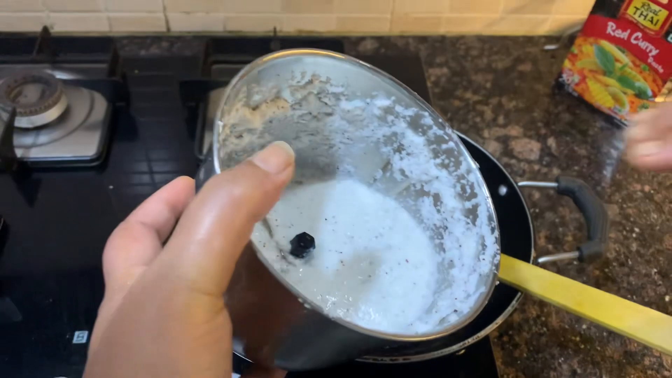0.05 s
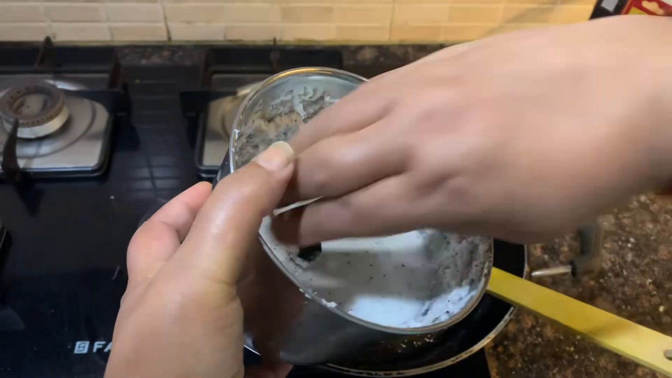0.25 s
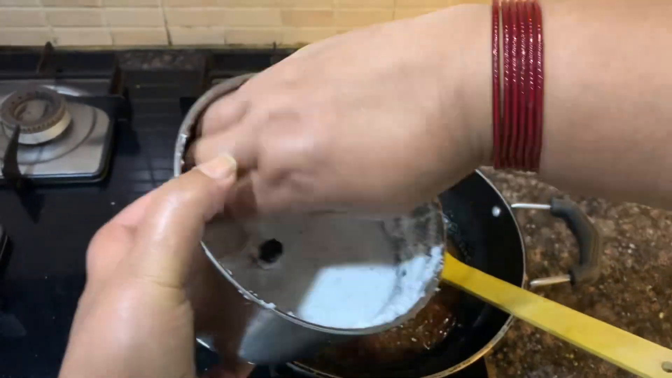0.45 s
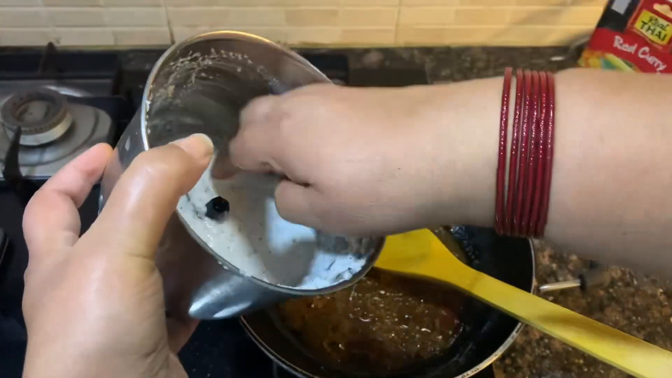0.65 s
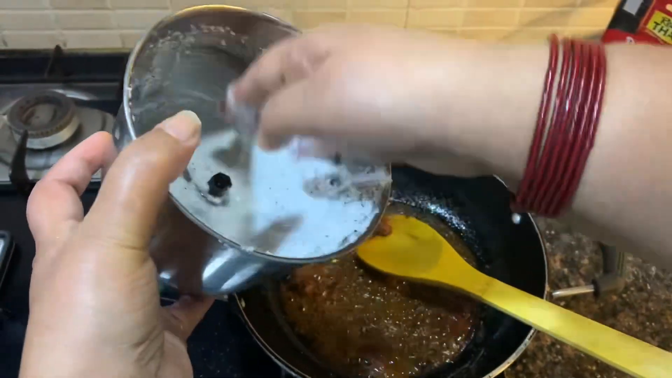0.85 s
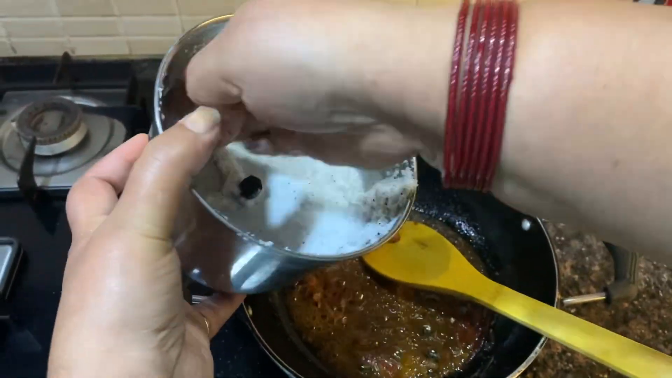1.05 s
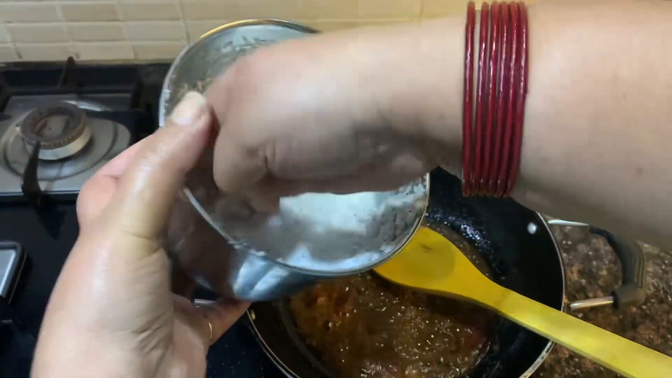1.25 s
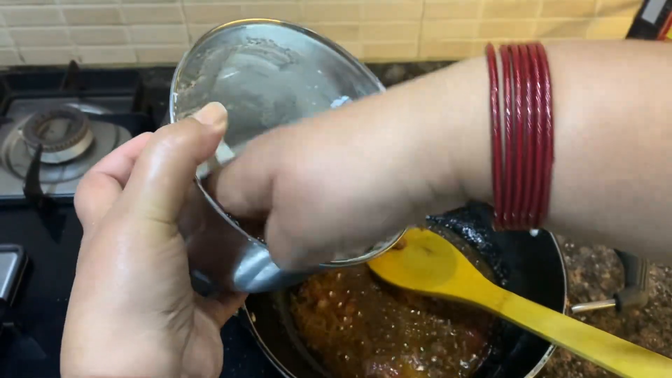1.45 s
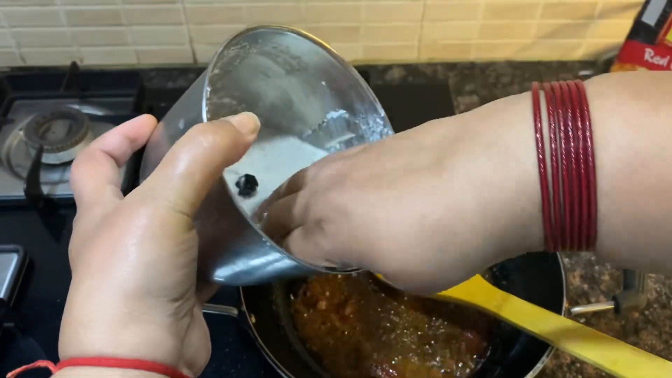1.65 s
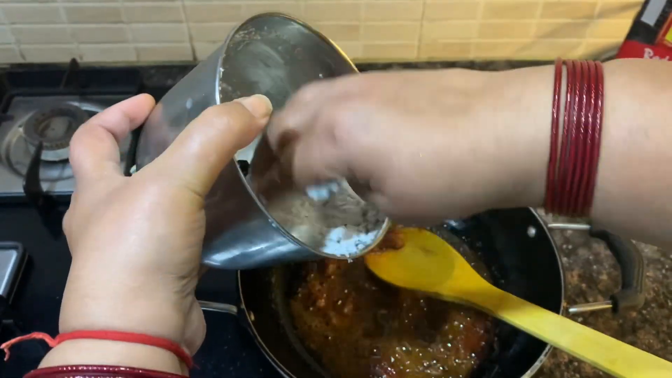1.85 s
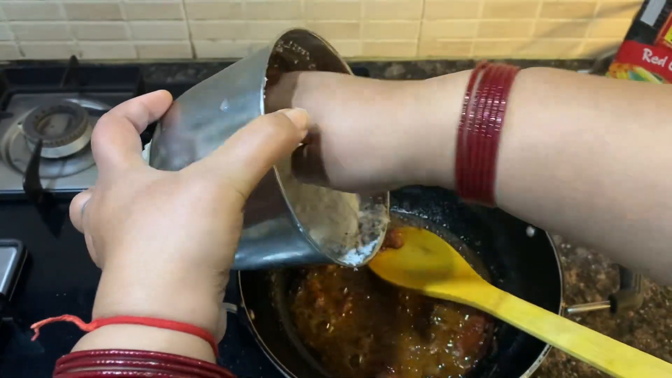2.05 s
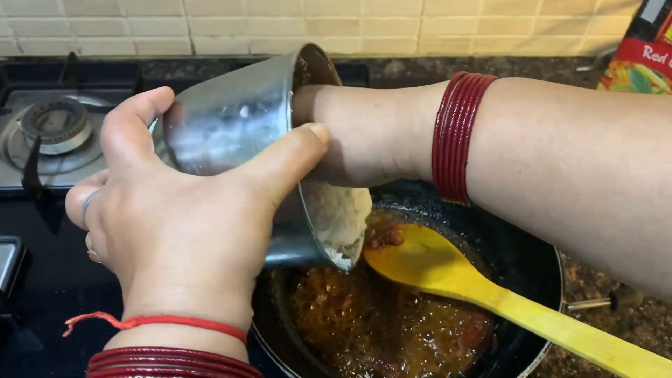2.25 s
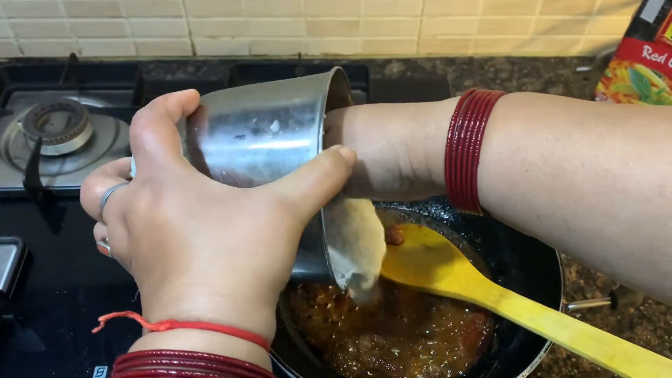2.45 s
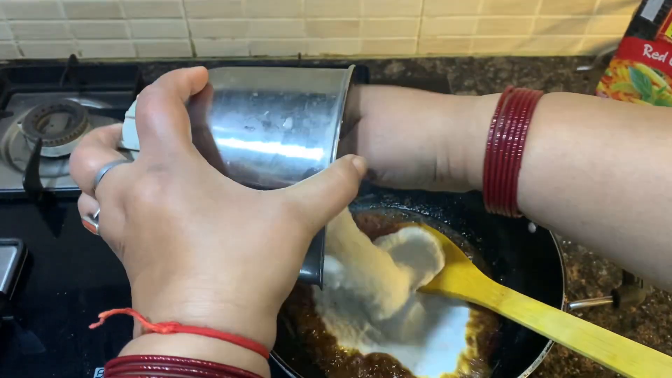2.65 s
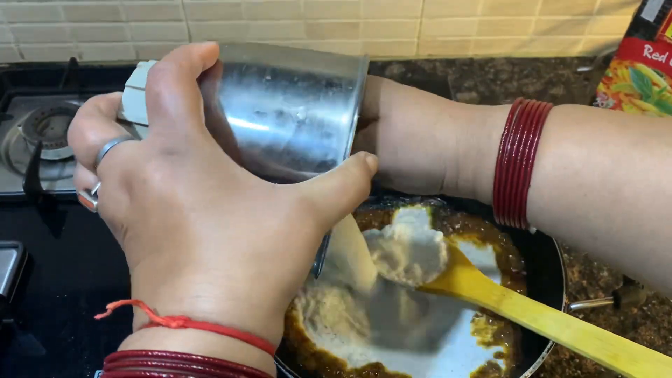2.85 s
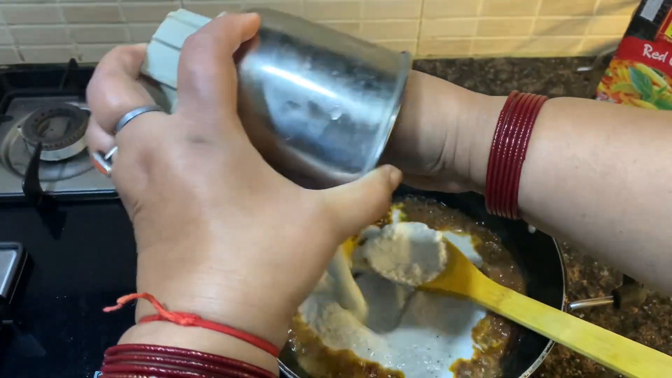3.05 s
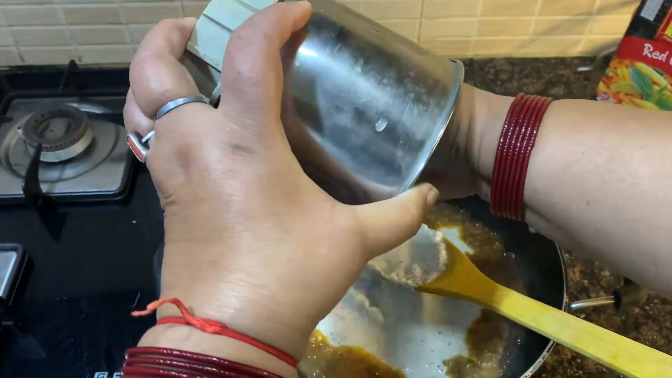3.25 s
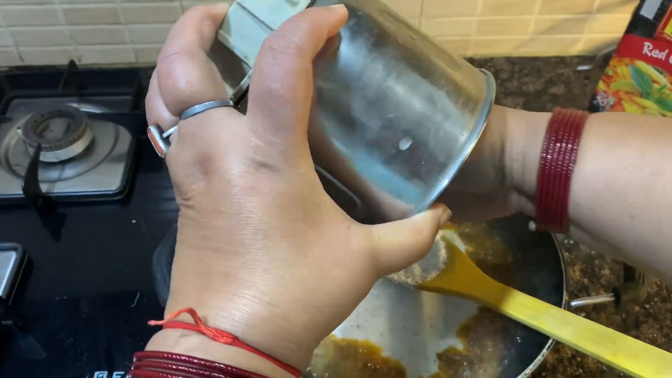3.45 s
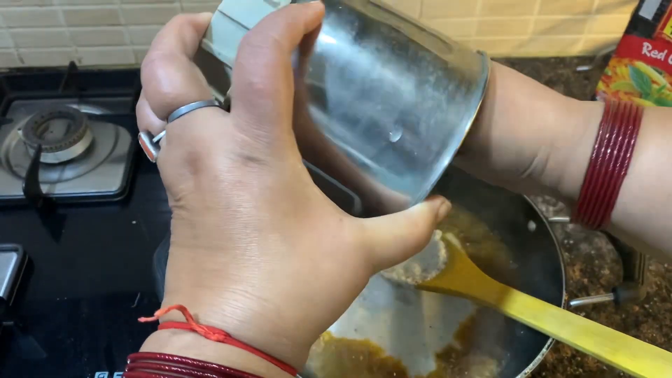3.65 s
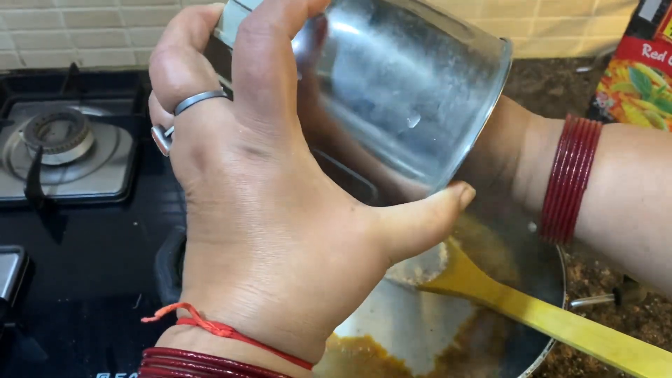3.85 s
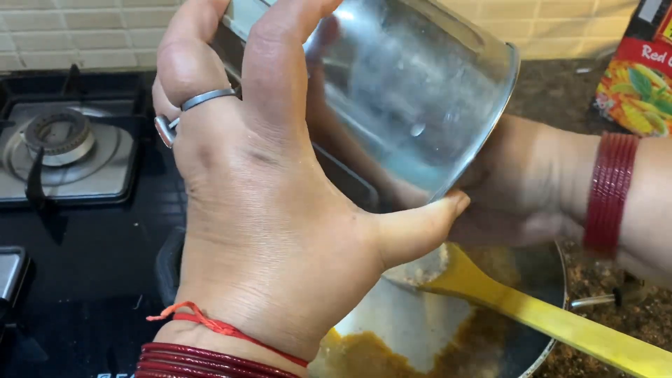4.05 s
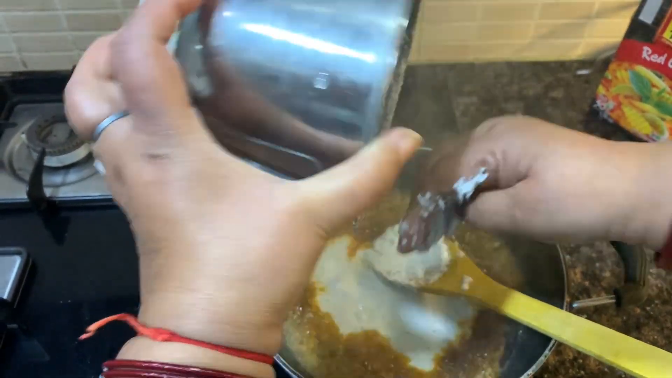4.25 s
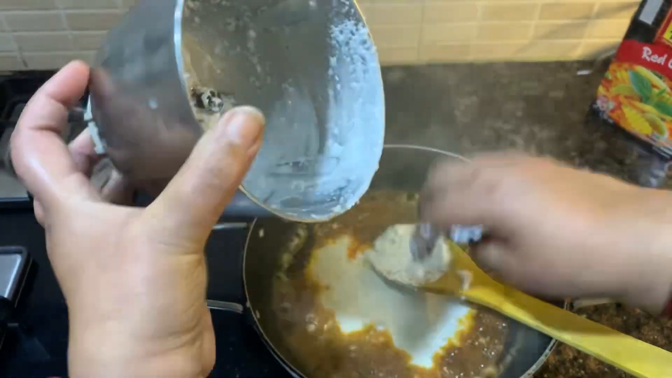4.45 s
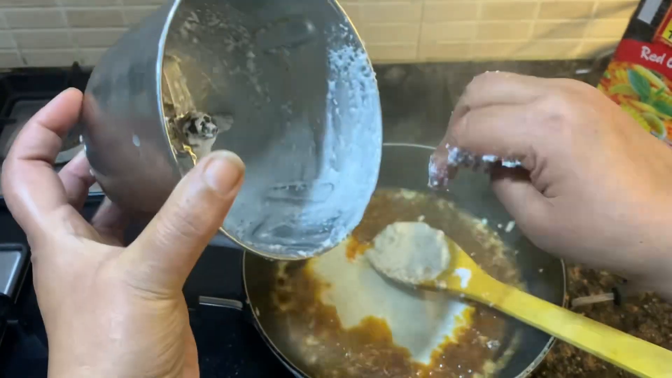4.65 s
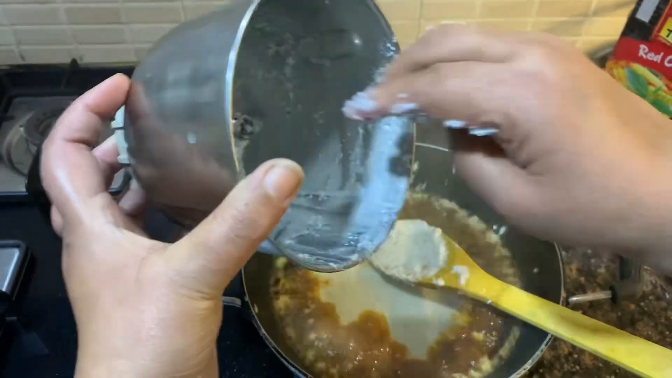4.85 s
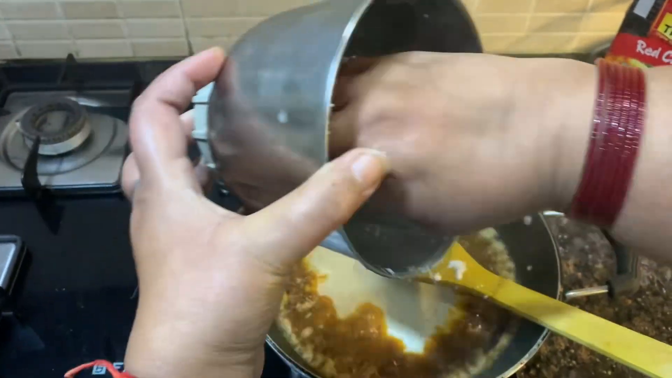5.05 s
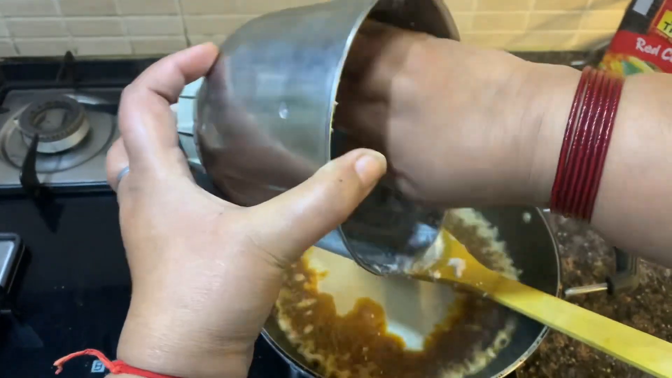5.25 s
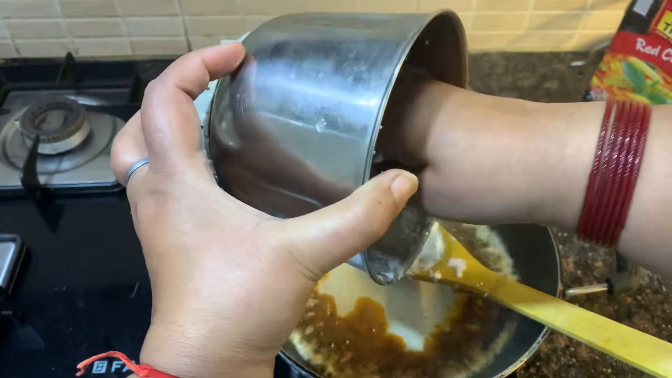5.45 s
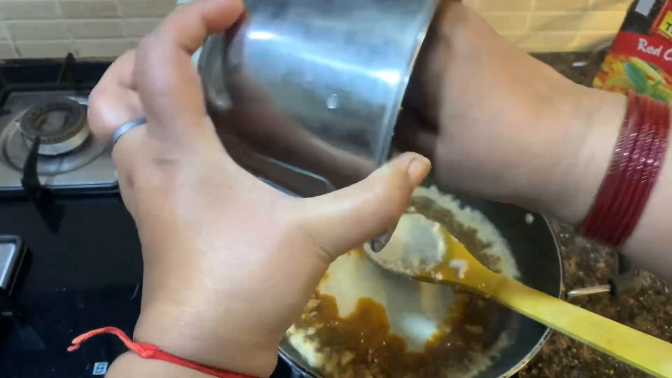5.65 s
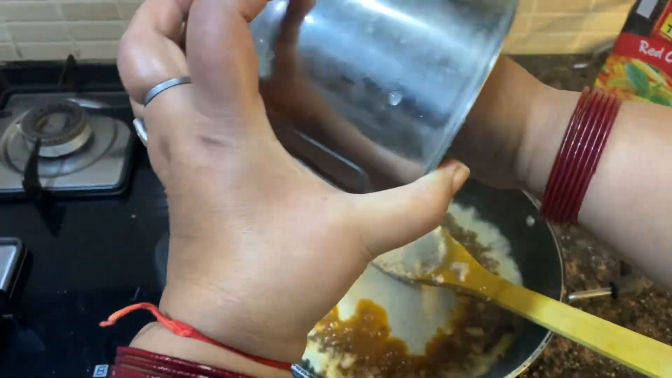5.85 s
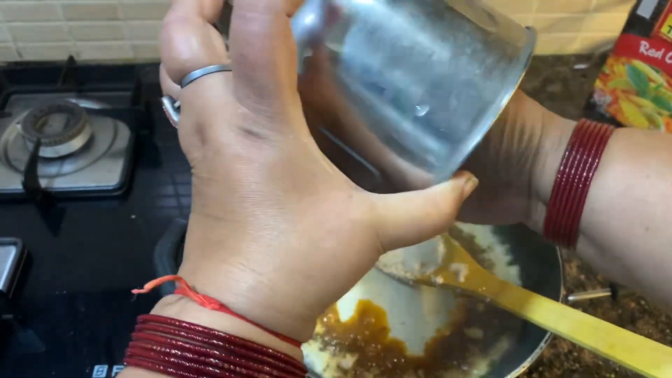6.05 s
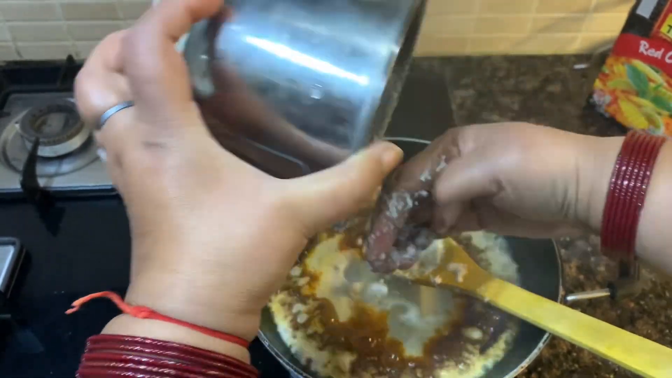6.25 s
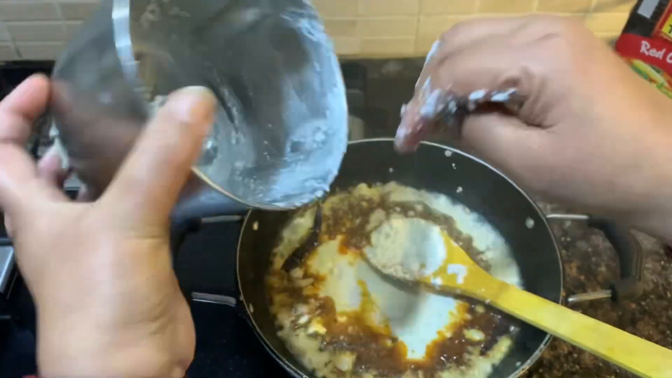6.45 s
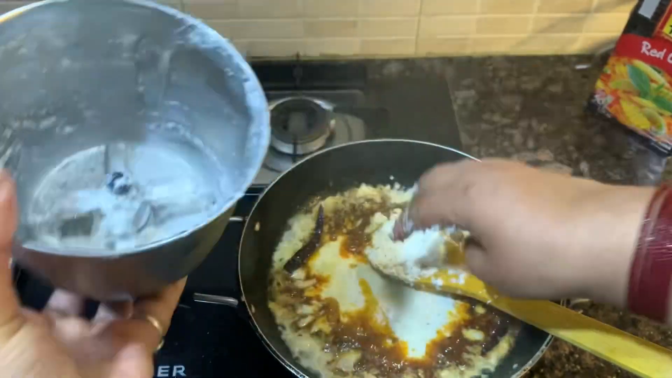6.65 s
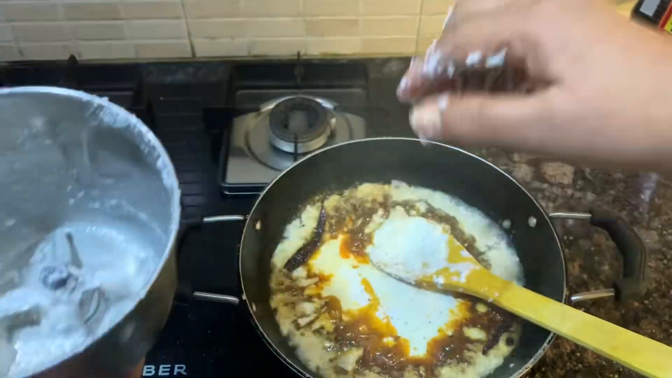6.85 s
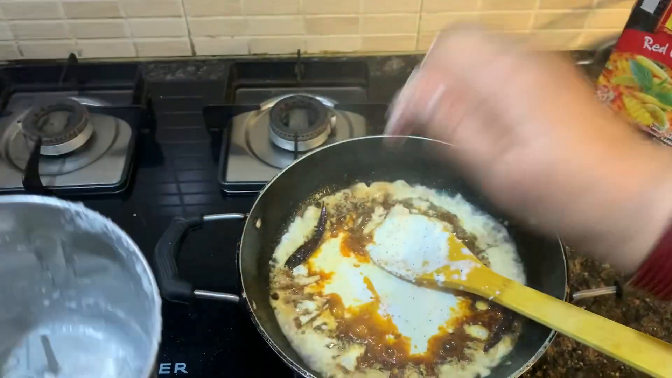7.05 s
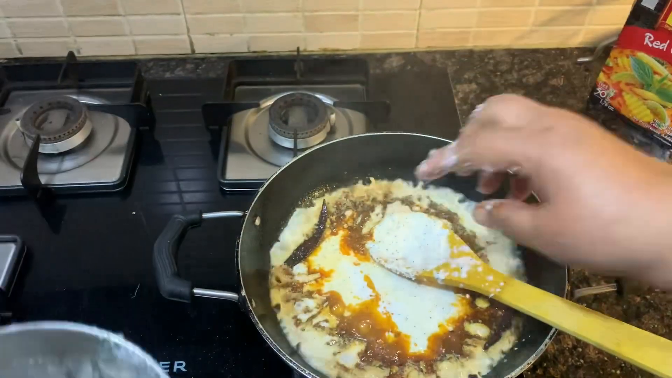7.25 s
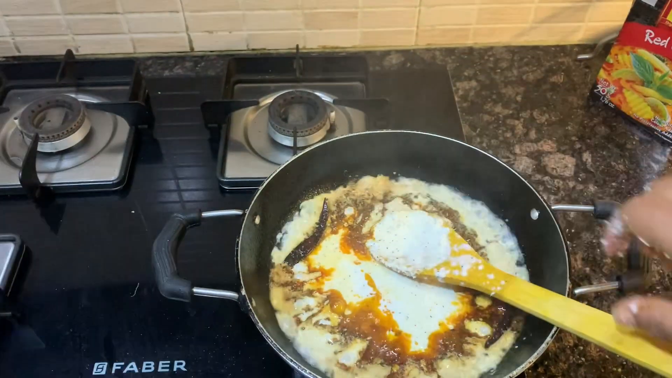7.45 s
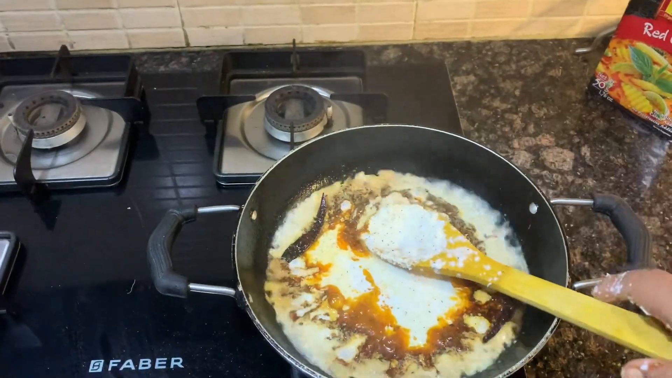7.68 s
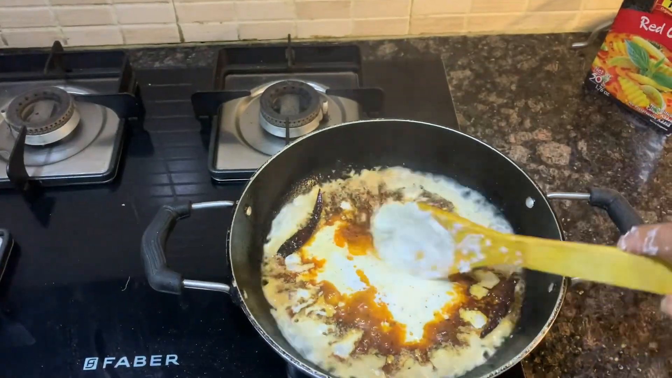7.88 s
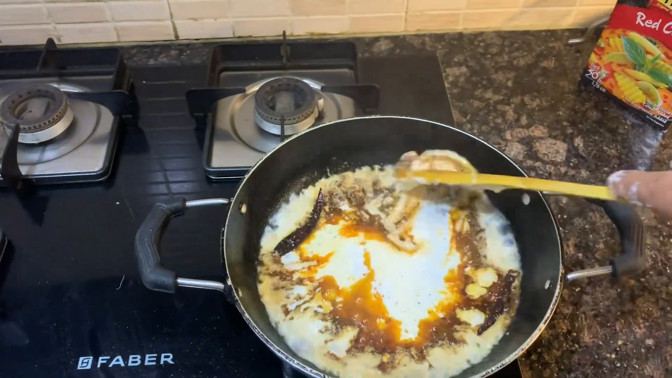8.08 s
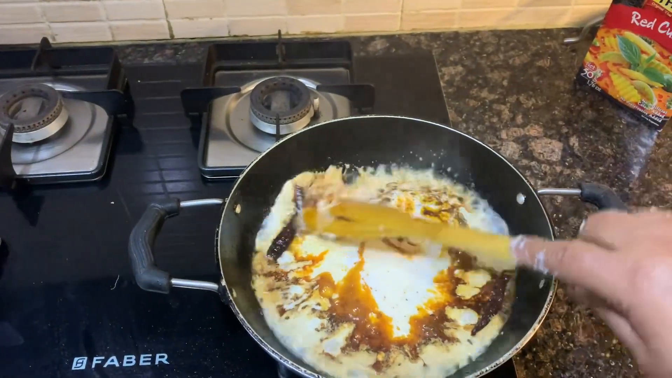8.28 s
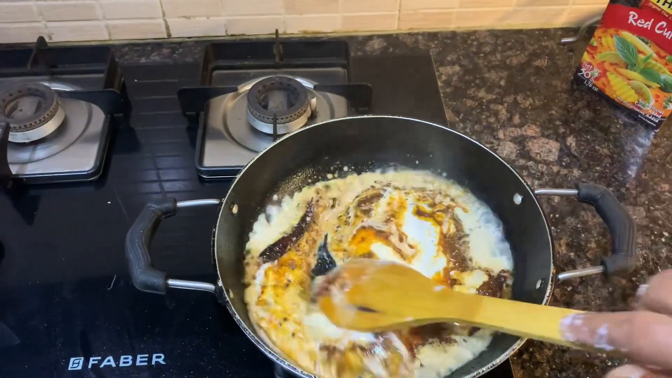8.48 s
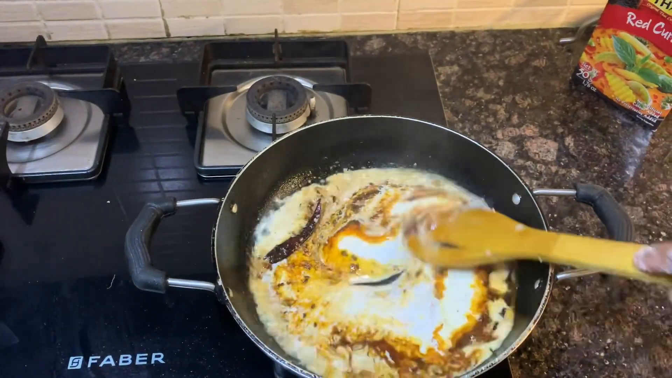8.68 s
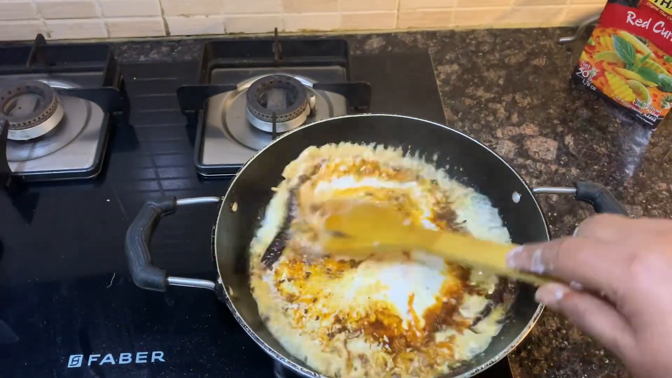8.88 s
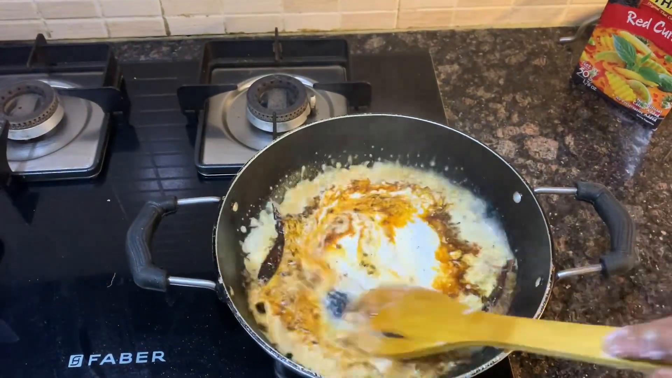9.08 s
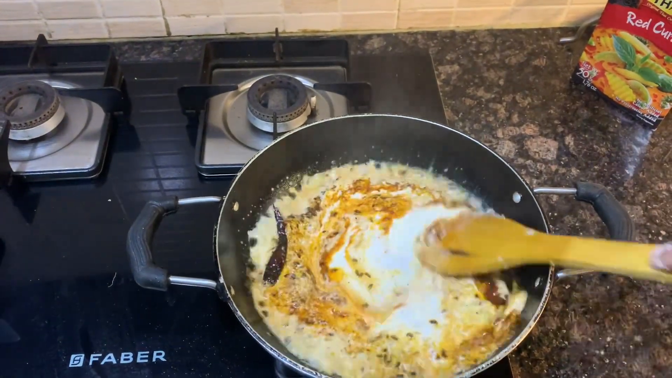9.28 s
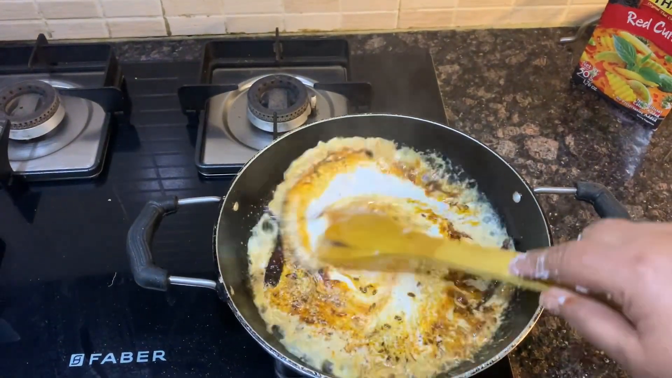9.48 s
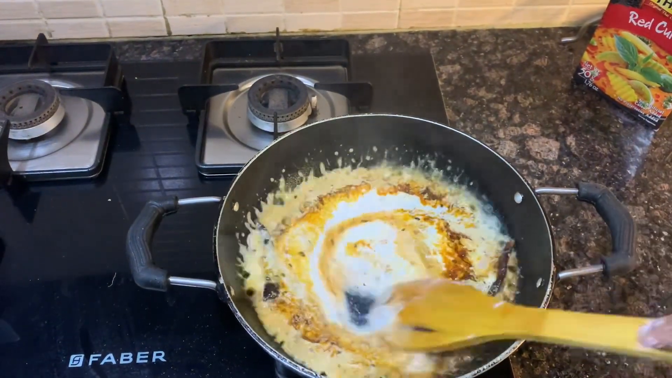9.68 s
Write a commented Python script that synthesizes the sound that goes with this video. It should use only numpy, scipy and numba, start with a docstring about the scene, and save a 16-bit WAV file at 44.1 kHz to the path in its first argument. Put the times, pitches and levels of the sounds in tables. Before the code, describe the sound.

Spice paste crackles and spits in a hot pan, then poured liquid bursts into a loud steamy hiss that settles to a bubbling simmer.

```python
"""In a kitchen, spice paste fries and spits in a pan; milk is poured in, flashes to steam with a loud hiss,
then simmers and is stirred. Sizzle is noise mixed with bubble bursts, in five pitch bands that rise and fall.
Spits are short rings with a spray of noise, sputters are rough noise, and a tapped steel jar rings briefly.
A phone above the stove hears it in stereo, over the hum and draught of a kitchen fan."""
import sys
import numpy as np
from scipy import signal
from scipy.fft import rfft, irfft
from scipy.io import wavfile
from scipy.ndimage import uniform_filter1d
from numba import njit

SR = 44100
rng = np.random.default_rng(int(sys.argv[2]) if len(sys.argv) > 2 else 0)


def unload_wav(signal):
    """Save mono or channel-first audio to the path in sys.argv[1] as 16-bit WAV at rate SR, clipped to [-1, 1]."""
    wavfile.write(
        sys.argv[1],
        SR,
        np.round(np.clip(np.atleast_2d(signal).T, -1, 1) * 32767).astype(np.int16),
    )


N = 428652
T, HZ = np.arange(N) / SR, np.fft.rfftfreq(N, 1 / SR)  # time of each sample, pitch of each spectrum bin


def undb(db):
    """Turn decibels into a plain multiplier."""
    return 10 ** (np.asarray(db) / 20)


def follow(points):
    """Draw straight lines over time through (start_s, value) points."""
    return np.interp(T, *np.transpose(points))


def level(x, db):
    """Scale a left-right pair so that the mean of both has this rms."""
    return x * undb(db) / np.sqrt(np.mean(np.mean(x, axis=0) ** 2))


def shape(points):
    """Gain at each pitch, from (pitch_hz, gain_db) points."""
    hz, db = np.transpose(points)
    return undb(np.interp(np.log(HZ + 1), np.log(hz), db))


def below(hz, order=24):
    """Gain of a low-pass; a higher order cuts more steeply."""
    return 1 / np.sqrt(1 + (HZ / hz) ** order)


def walk(rate_hz):
    """Smooth random wandering around 0: held random levels, averaged twice; spread near 1."""
    hold = int(SR / rate_hz)
    steps = np.repeat(rng.standard_normal(N // hold + 1), hold)
    return 1.4 * uniform_filter1d(uniform_filter1d(steps, hold), hold)[:N]


@njit
def ring(n, at, hz, t60, size, glide):
    """Decaying sines, each gliding up like a closing bubble; t60 is the time to fall by 60 dB."""
    y = np.zeros(n)
    for k in range(len(at)):
        step = np.exp((2j * np.pi * hz[k] - np.log(1000) / t60[k]) / SR)
        # glide is the share by which the pitch rises during t60
        turn = np.exp(2j * np.pi * hz[k] * glide / (t60[k] * SR * SR))
        z = size[k] + 0j
        for i in range(at[k], min(n, at[k] + int(t60[k] * SR))):
            y[i] += z.imag
            z, step = z * step, step * turn
    return y


# around this pitch, loosening makes the left and right sides unrelated
CANCEL_HZ, CANCEL_WIDTH_HZ = 3080, 480
# stereo picture at each pitch, by right-side lead, likeness of the sides and level difference:
# pitch_hz, right_lead_turns, likeness (share 0-1), right_minus_left_db
STEREO_PICTURE = [(0, 0, .91, 0), (400, 0, .93, 0), (700, .1, .76, -2), (900, .15, .8, -1),
                  (1200, .2, .62, -1), (1700, .5, .2, -2), (2200, 1.1, .2, -3), (2750, 1.4, .45, -2),
                  (2950, 1.5, .995, 0), (3350, 1.5, .995, 0), (3500, 1.55, .5, -3), (3800, 1.75, .15, -4),
                  (4400, 2.0, .5, -5), (5000, 2.1, .25, -5), (6000, 2.83, .4, -3.5), (6500, 3.0, .92, 0),
                  (6800, 3.0, .9, 0), (7100, 2.9, .57, 0), (8000, 2.72, .75, 0), (8500, 2.58, .76, 0),
                  (8950, 2.5, .99998, 0), (10250, 2.5, .99998, 0), (10600, 2.42, .81, 0),
                  (11200, 2.3, .84, 0), (11700, 2.2, .55, 0), (11950, 2.0, .9995, 0),
                  (14250, 2.0, .9995, 0), (14600, 1.92, .63, 0), (15500, 1.64, .68, 0),
                  (15800, 1.56, .75, 0)]


def stereo(shared, left, right, loosen=0):
    """Left and right spectra: a shared part, shifted on the right, and a part that each side has alone."""
    hz, *columns = np.transpose(STEREO_PICTURE)
    turns, alike, tilt_db = (np.interp(HZ, hz, c) for c in columns)
    near_cancel = np.exp(-((HZ - CANCEL_HZ) / CANCEL_WIDTH_HZ) ** 4)
    alike = np.clip(alike * (1 - loosen * near_cancel), 0, 1)
    together, alone = np.sqrt(alike), np.sqrt(1 - alike)
    common = together * rfft(shared)
    on_left = common + alone * rfft(left)
    on_right = (common * np.exp(2j * np.pi * turns) + alone * rfft(right)) * undb(tilt_db)
    return np.array([on_left, on_right])


def bursts(share, count=20000, cycles=13.5, scatter_db=4.5, cap_db=6):
    """Steam noise mixed with bursting bubbles of all sizes, some of them louder; flat spectrum."""
    when, pitch, luck, length = rng.random((count, 4)).T
    hz = 300 + 15500 * pitch
    louder_db = np.minimum(-scatter_db * np.log(1 - luck), cap_db)
    size = undb(louder_db) * np.sqrt(hz)  # high bubbles ring for less time, so they start stronger
    t60 = cycles * (.5 + 2 * length) / hz
    pops = ring(N, (when * N).astype(np.int64), hz, t60, size, 0.97)
    return np.sqrt(share) * pops / np.std(pops) + np.sqrt(1 - share) * rng.standard_normal(N)


# strength of the two finest bands, before gusts and flicker: start_s, steam_hiss_db, fizz_db
SIZZLE_LEVELS = [(0.0, -44, -43), (0.45, -46, -45.5), (0.95, -42, -42), (1.3, -42.5, -46.5),
                 (1.9, -42.5, -42), (2.2, -43.5, -43.5), (2.45, -44, -42), (2.49, -34, -39.5),
                 (2.63, -34.5, -39.5), (2.65, -30.5, -36), (2.75, -30, -34), (3.03, -24.5, -29),
                 (3.08, -27, -31), (3.34, -23.5, -29), (3.72, -26.5, -35), (4.1, -30, -37),
                 (4.51, -28.5, -37), (4.9, -32.5, -41), (5.5, -34.5, -43), (6.2, -36, -43.5),
                 (6.45, -33, -43.5), (6.9, -31.5, -40), (7.2, -35.5, -45), (7.7, -34.5, -43),
                 (7.95, -35.5, -42), (8.3, -33.5, -39.5), (8.7, -35.5, -42), (9.05, -30.5, -39),
                 (9.35, -34.5, -39.5), (9.72, -30, -41)]
# strength of the two lowest bands beside the fizz, rising and falling over time:
# start_s, bubbling_minus_fizz_db, boil_minus_fizz_db
BIG_BUBBLE_LEVELS = [(0, -16.5, -17.5), (1.2, -21, -20.5), (2.3, -25, -19.5), (2.6, -18, -21),
                     (2.9, -16.5, -17), (3.6, -19.5, -13), (4.5, -22, -16), (5.6, -16, -12),
                     (7.2, -13.5, -15.5), (8.4, -17, -16.5), (9.72, -14.5, -15.5)]
# middle-sized bubbles: start_s, coarse_fizz_minus_fizz_db
COARSE_FIZZ_LEVELS = [(0, -5.5), (1.2, -10), (2.3, -13), (2.9, -12.5), (3.6, -9), (4.5, -12), (5.6, -8.5),
                      (6.5, -13), (7.2, -11), (8.1, -8.5), (8.8, -12), (9.72, -9)]
# edges between the five bands, from boil up to steam hiss: pitch_hz
BAND_EDGES = [250, 1050, 2100, 3700, 7900, 17000]
# how much of the hiss power is separate bubble bursts: start_s, share (0-1)
CRACKLE_SHARE = [(0, 0.31), (2.42, 0.46), (2.5, 0.15), (2.8, 0.12), (3.4, 0.06), (4, 0.05), (6, 0.09),
                 (8, 0.1), (9.72, 0.25)]
# around 3 kHz the left and right sides sometimes cancel when summed; how fully, over time,
# before a random waver: start_s, fullness (full from 1 on)
CANCELLING = [(0, 0), (1.4, 0), (2.5, 0.3), (3.0, 0.4), (3.25, 0), (3.7, 0.9), (4.2, 0.4), (5.28, 0.6),
              (5.36, 1.4), (5.72, 1.2), (5.8, 0.3), (6.2, .6), (6.3, 1.3), (7.35, 1.3), (7.45, .8),
              (7.72, 1.2), (7.8, .2), (8.5, .3), (8.62, 1.4), (9.1, 1.3), (9.18, 0.3), (9.48, .4),
              (9.54, 1.5)]
# overall colour of the sizzle on the left side: pitch_hz, gain_db
SIZZLE_COLOUR = [(200, -13.5), (1200, -16), (2500, -7), (4000, -6), (6000, -2), (7000, -4), (8200, -4.5),
                 (10000, -1.5), (11250, 2.5), (11900, -9.5), (13000, -6), (15600, -5.5)]
# colour from the ring of the pan: pitch_hz, jar_over_pan_db, jar_away_db
PAN_RING = [(310, -14, -21), (330, -2.5, -9), (426, -4, -3), (500, 1, -1.5), (626, -8, -14),
            (720, -5, -1.5), (760, -11, -10), (802, 4.5, 1.5), (838, 2.5, -2.5), (880, 0, -9),
            (975, -10.5, 3.5), (1068, -1, 1.5), (1136, 7, 8.5), (1240, 2, 4.5), (1370, 7.5, 8),
            (1680, 3.5, 0.5), (1930, 10.5, 9), (1820, 1.5, 0.5)]
# when the jar is taken from over the pan: start_s, end_s
JAR_LEAVES = (6.3, 6.7)
CANCEL_WAVER = 0.25
BOIL_FLICKER_DB, BOIL_FLICKER_HZ = 1.05, 34.88


def pan_ring(both):
    """The pan strengthens some pitches; its colour changes as the jar is taken away."""
    away = np.interp(T, JAR_LEAVES, (0, 1))
    pan = np.array(PAN_RING)
    with_jar = irfft(both * shape(pan[:, :2]), N)
    without_jar = irfft(both * shape(pan[:, ::2]), N)
    return (1 - away) * with_jar + away * without_jar


def sizzle():
    """Bubbles of five sizes: the bigger the bubble, the lower its band; each band has its own strength."""
    s, hiss_db, fizz_db = np.transpose(SIZZLE_LEVELS)
    hiss_db, fizz_db = np.interp(T, s, hiss_db), np.interp(T, s, fizz_db)
    s, bubbling_db, boil_db = np.transpose(BIG_BUBBLE_LEVELS)
    boil_db = fizz_db + np.interp(T, s, boil_db)
    bubbling_db = fizz_db + np.interp(T, s, bubbling_db)
    coarse_db = fizz_db + follow(COARSE_FIZZ_LEVELS)
    band_levels = [boil_db, bubbling_db, coarse_db, fizz_db, hiss_db]

    share = follow(CRACKLE_SHARE)
    sources = bursts(share), bursts(share), bursts(share)
    cancel = np.clip(follow(CANCELLING) + CANCEL_WAVER * walk(12), 0, 1)
    cancelling = irfft(stereo(*sources), N)
    unrelated = irfft(stereo(*sources, loosen=1.0), N)
    both = rfft(cancel * cancelling + (1 - cancel) * unrelated) * shape(SIZZLE_COLOUR)
    both = rfft(pan_ring(both))

    out = 0
    surge_db = share * 2.9 * walk(50)  # sparse frying comes in gusts
    for lo, hi, db in zip(BAND_EDGES, BAND_EDGES[1:], band_levels):
        lower_cut = np.sqrt(1 - below(lo, order=min(48, max(8, lo // 160))) ** 2)
        band = below(hi, order=min(48, hi // 160)) * lower_cut
        flicker_db = share * 4 * walk(45) + BOIL_FLICKER_DB * walk(BOIL_FLICKER_HZ)
        out = out + level(irfft(both * band, N), 0) * undb(db + surge_db + flicker_db)
    return out


# small spits fall by chance until the milk drowns the oil
SMALL_COUNT, SMALL_UNTIL_S = 220, 2.5
SMALL_TOP_DB, SMALL_RANGE_DB, SMALL_SIDE_DB = -28, 6, 10
SMALL_LOW_HZ, SMALL_HIGH_HZ = 2620, 14800


def small_spits():
    """Rows like those of the loud spits, drawn by chance; high pitches are the more common."""
    when, size, pitch, place = rng.random((SMALL_COUNT, 4)).T
    hz = SMALL_LOW_HZ + (SMALL_HIGH_HZ - SMALL_LOW_HZ) * pitch ** 0.8
    db = SMALL_TOP_DB - SMALL_RANGE_DB * size
    side_db = SMALL_SIDE_DB * (1 - 2 * place)
    return np.transpose([when * SMALL_UNTIL_S, db, hz, side_db])


# loud spits of oil, before colouring: start_s, ring_level_db, pitch_hz (start of the glide),
# left_minus_right_db (before it is narrowed where the sides are alike)
LOUD_SPITS = [(0.075, -12, 10300, 1), (0.0877, -6.5, 11800, 1), (0.1457, -19, 10600, -3),
              (0.1601, -21, 8900, 0), (0.2036, -28, 8700, -4), (0.2259, -18, 9500, 0),
              (0.257, -21, 5000, 7), (0.2606, -21, 5600, 8), (0.2668, -26, 6300, 5),
              (0.3591, -19, 10800, 0), (0.3963, -12.5, 10500, 4), (0.4113, -18, 8900, -3),
              (0.4687, -21, 3500, 6), (0.5136, -17, 9650, -2), (0.5741, -22, 7400, 1),
              (0.6001, -13, 11000, 0), (0.6271, -21, 8300, 1), (0.6343, -13.5, 9700, 1),
              (0.6394, -23, 10300, 1), (0.6751, -22, 8200, 0), (0.6879, -23, 4900, 3),
              (0.7243, -18, 10400, 0), (0.7943, -18, 9500, -2), (0.8054, -18, 10600, 1),
              (0.8163, -18, 9500, 1), (0.8492, -24, 8900, -1), (0.8644, -23, 9400, -1),
              (0.9024, -25, 7600, 3), (0.9083, -11, 9200, 3), (0.9151, -22, 12900, 3),
              (0.951, -14, 10900, 6), (0.9759, -4, 10400, 0.5), (0.9789, -19, 9600, 2),
              (1.0305, -12, 9900, 0), (1.0688, -14, 10000, -1), (1.0895, -23, 10200, 2),
              (1.0977, -21, 11300, 0), (1.1249, -12.5, 8300, -8), (1.128, -6, 11700, -1),
              (1.1316, -32, 4600, -3), (1.1571, -18, 9600, 0), (1.1639, -16, 9000, 0),
              (1.2431, -18.5, 5370, 3), (1.2697, -27, 8900, 0), (1.2735, -17, 10100, 0),
              (1.2835, -19, 4180, -3), (1.2837, -32, 5900, -1), (1.3195, -23, 9200, -1),
              (1.3228, -11.5, 9100, 3), (1.3274, -9, 9600, 0), (1.3654, -18, 9800, 0),
              (1.3683, -20, 8400, 0), (1.3713, -16.5, 4700, -2), (1.3875, -17, 10800, 1),
              (1.4124, -5.5, 11600, -4), (1.4316, -14, 9100, 3), (1.446, -14, 7500, -3),
              (1.4515, -18, 7400, 1), (1.467, -21, 8800, -1), (1.4735, -14, 9700, 2),
              (1.4946, -15, 6400, -4), (1.5043, -15, 11300, 1), (1.552, -22, 10200, 1),
              (1.5579, -25, 8800, -1), (1.5698, -22, 10100, 0), (1.5759, -20, 9100, 3),
              (1.5966, -22, 9800, -1), (1.6029, -15, 8800, 4), (1.6151, -8.5, 10300, -2),
              (1.6195, -9.5, 9400, 9), (1.6903, -18, 8600, -1), (1.6966, -17, 9000, -1),
              (1.713, -21, 7700, 1), (1.7329, -16, 4180, 2), (1.7596, -22, 7900, -1),
              (1.7624, -20, 2800, 6), (1.7895, -16, 8300, -1), (1.8181, -14.5, 4500, 7),
              (1.8266, -21, 2300, 3), (1.8285, -17, 7900, 2), (1.8646, -22, 9600, 9),
              (1.8853, -21, 8500, 0), (1.9012, -19, 7300, 1), (1.9365, -21, 9800, 1),
              (1.9426, -13, 10500, 1), (1.9491, -13, 4160, 8), (1.9843, -20, 11800, 0),
              (2.0117, -7, 9000, 5.5), (2.0429, -13, 10200, -1), (2.0516, -13, 8200, -5),
              (2.0641, -21, 10400, 0), (2.0804, -21, 9200, 7), (2.1051, -22, 8500, 0),
              (2.1163, -21, 7900, 0), (2.1199, -16, 8500, 3), (2.175, -18, 10500, 4), (2.204, -22, 2400, 2),
              (2.2339, -13, 7500, 2), (2.2613, -11.5, 10300, 0), (2.2709, -24, 8000, -1),
              (2.3088, -25, 8400, 1), (2.3206, -20, 8300, 0), (2.3394, -13, 6230, 1),
              (2.3803, -24, 6100, 0), (2.3955, -14.5, 6650, 1), (2.4358, -22, 10800, 1),
              (2.4563, -14.5, 4600, 9), (2.4966, -12.5, 8350, 0), (2.5522, -23, 11400, 0),
              (2.7513, -12, 2830, 0), (5.721, -27, 9500, -4), (6.3135, -19, 10600, -2),
              (6.6003, -17, 9600, 0), (6.6213, -16, 11000, 0), (7.3617, -21, 10600, -2),
              (7.4005, -24, 11500, -3), (7.5124, -27, 10800, -3), (7.8139, -19, 10200, -1),
              (7.9883, -22, 10400, -2), (8.3854, -16, 8400, -2), (8.4673, -24, 9700, 0),
              (8.5417, -17, 10400, -2), (8.8889, -26, 10600, -5), (9.2744, -28, 7850, -3),
              (9.2751, -21, 4330, 7)]
# colour of all spits: pitch_hz, gain_db
SPIT_TONE = [(2000, 0), (6000, -1), (9000, 2), (11200, 3.5), (12100, -3.5), (15000, 0.5)]
# spray t60 of a -27 dB spit; it doubles when the spit is this much louder
SPRAY_S, SPRAY_DOUBLES_DB = 0.02, 14


def spits(ring_cycles=16., spray_db=-13., spread=1.4, snap_cycles=3.5, snap_db=11., snap_slope=.7, own_db=-5):
    """Each spit is a snap that grows faster than its level, a ring gliding up and a short spray of noise."""
    s, db, hz, side_db = np.vstack([LOUD_SPITS, small_spits()]).T
    at = (s * SR).astype(np.int64)
    spray_t60 = np.clip(SPRAY_S * 2 ** ((db + 27) / SPRAY_DOUBLES_DB), .003, .06)
    size = undb(db + np.outer([.5, -.5], side_db))  # left row, right row
    snap_gain = undb(snap_db + snap_slope * db)
    parts = []
    for gain in size:
        rings = ring(N, at, hz, ring_cycles / hz, gain, 0.22)
        snaps = ring(N, at, hz, snap_cycles / hz, snap_gain * gain, 0.)
        parts.append(rings + snaps)
    parts = np.array(parts)

    for i, f, decay, gain in zip(at, hz, spray_t60, size.T):
        t = T[:min(int(decay * SR), N - i)]
        noise = rng.standard_normal((3, 2700))[:, :len(t)]
        own = min(np.mean(gain) / undb(own_db), 1)  # loud sprays differ more from left to right
        spray = np.sqrt(1 - own) * noise[0] + np.sqrt(own) * noise[1:]
        spray = spray * undb(spray_db - 60 * t / decay)
        band = signal.butter(2, [f / spread, min(f * spread, .45 * SR)], "bandpass", fs=SR)
        parts[:, i:i + len(t)] += gain[:, None] * signal.lfilter(*band, spray)

    # place matters little where the two sides are alike
    stereo_hz, turns, alike = np.transpose(STEREO_PICTURE)[:3]
    apart = np.clip(.12 + 3 * np.sqrt(1 - np.interp(HZ, stereo_hz, alike)), 0, 1)
    parts = rfft(parts)
    middle = parts.mean(axis=0)
    parts = middle + apart * (parts - middle)
    lead = np.exp(2j * np.pi * np.outer([0, 1], np.interp(HZ, stereo_hz, turns)))
    return irfft(parts * lead * shape(SPIT_TONE) * (1 - below(2100, order=4)), N)


# longer sputters of wet paste: start_s, length_s, centre_hz, rms_db (about), left_minus_right_db
PASTE_SPUTTERS = [(0.017, 0.039, 5500, -39.5, 10), (0.071, .012, 11200, -33, 3.5),
                  (0.248, 0.034, 4930, -36, 10), (0.423, 0.069, 3380, -45, 10),
                  (0.464, 0.082, 4160, -39, 8), (0.567, 0.048, 2600, -49, 11),
                  (0.678, 0.035, 4420, -41, 10), (0.745, 0.024, 3640, -46, 10),
                  (0.844, 0.032, 5500, -42, 11), (1.32, 0.017, 9500, -37, -2),
                  (1.368, 0.028, 4180, -37, -1), (1.498, .02, 6640, -36, 3), (1.688, 0.016, 6500, -39, -2),
                  (1.727, 0.034, 4100, -36.5, 3), (1.756, 0.032, 2800, -43, -2),
                  (1.81, 0.035, 4400, -39.5, 6)]


def sputters(spread=1.22, rise=0.14):
    """Noise whose strength jumps about, heard as a rough hiss around one pitch."""
    out = np.zeros((2, N))
    for s, length, hz, db, side_db in PASTE_SPUTTERS:
        i, n = int(s * SR), int(length * SR)
        jumps = np.repeat(1.2 + rng.exponential(size=100), 40)  # each strength lasts 40 samples
        grit = rng.standard_normal((2, 4000)) * jumps
        band = signal.butter(2, [hz / spread, hz * spread], "bandpass", fs=SR)
        hiss = signal.lfilter(*band, grit)[:, :n]
        swell = np.interp(np.arange(n) / n, (0, rise, 1), (0, 1.7, 0))
        sides = undb(db + np.array([[side_db], [-side_db]]) / 2)
        out[:, i:i + n] += hiss / np.std(hiss) * swell * sides
    return out


# a finger taps the steel jar: start_s, level_db (before the attack is softened)
JAR_TAPS = [(1.192, -33.5)]
# tones of the jar: pitch_hz, level_db (added to the tap), t60_s (before the hand mutes it)
JAR_TONES = [(816, 1.5, 0.17), (960, -4, 0.055), (1400, -16, 0.1)]
# it rings freely this long, then the hand mutes it by this much, over this time
JAR_FREE_S, JAR_GRIP_DB, JAR_GRIP_S = 0.0077, -11, 0.0044


def taps():
    """The jar rings for a moment until the hand mutes it; the soft fingertip blunts the attack."""
    s, db = np.transpose(JAR_TAPS)
    at, one = (s * SR).astype(np.int64), np.ones(len(s))
    rings = sum(ring(N, at, hz * one, t60 * one, undb(db + tone_db), 0.) for hz, tone_db, t60 in JAR_TONES)
    grip = sum(np.clip((T - start - JAR_FREE_S) / JAR_GRIP_S, 0, 1) for start in s)
    rings = rings * undb(JAR_GRIP_DB * grip)
    rings = signal.lfilter(*signal.butter(2, 620, "highpass", fs=SR), rings)
    return uniform_filter1d(rings, int(.0008 * SR))


# motor hum, around which pitch and level waver: pitch_hz, rms_db
FAN_HUM = [(86.1, -76.5), (172.3, -77.5)]
# colour of the draught, relative: pitch_hz, level_db (per Hz)
DRAUGHT_COLOUR = [(15, -41), (30, -10), (82, 1.5), (125, -8.5), (172, 1.5), (216, -3.5), (382, -1.5),
                  (460, -11.5), (525, -15), (600, -31), (780, -46), (1320, -120)]
# strength of the draught: start_s, rms_db
DRAUGHT_LEVELS = [(0.0, -59), (1.0, -57.5), (1.4, -68), (2.0, -60), (3.4, -63), (3.8, -66.5), (5.2, -63),
                  (5.6, -68), (5.9, -64), (7.5, -66), (7.85, -60), (9.72, -63)]


def fan():
    """Moving air makes low noise; the motor makes slightly wavering tones."""
    air = irfft(stereo(*rng.standard_normal((3, N))) * shape(DRAUGHT_COLOUR), N)
    hum = 0
    for hz, db in FAN_HUM:
        loudness = np.sqrt(2) * undb(db + 1.4 * walk(6))
        pitch = hz * (1 + 0.002 * walk(2.94))
        hum = hum + loudness * np.sin(2 * np.pi * np.cumsum(pitch) / SR)
    return level(air, 0) * undb(follow(DRAUGHT_LEVELS)) + hum


def scene():
    """Add all sources, left and right."""
    return sizzle() + spits() + sputters() + taps() + fan()


# the level below the finest hiss dips briefly: start_s, end_s, depth_db (before the band shares)
LEVEL_DIPS = [(5.43, 5.61, -5.5), (5.633, 5.73, -5), (6.028, 6.165, -1.5), (6.435, 6.516, -7),
              (6.645, 6.844, -12), (6.84, 6.91, -6.5), (7.545, 7.65, -12), (7.683, 7.729, -7),
              (8.634, 8.736, -2)]
# how deep each band sinks, before uneven wandering: from_hz, to_hz, share_of_depth
DIP_SHARES = [(67, 300, 0.75), (300, 750, 1.1), (750, 1700, 0.8), (1700, 4600, 1.05), (4600, 6500, 0.95),
              (6500, 7900, 0.9)]
DIP_UNEVEN, TOP_HZ = 0.24, 15780


def record(dry):
    """All but the finest hiss and the deep bass dips unevenly at times; the top is cut."""
    dip_db = sum(db * ((T > start) & (T < end)) for start, end, db in LEVEL_DIPS)
    dip_db = uniform_filter1d(1. * dip_db, int(0.02 * SR))  # soft edges
    wet, spectrum = dry, rfft(dry)
    for lo, hi, depth in DIP_SHARES:
        band = irfft(spectrum * (below(hi, order=40) - below(lo, order=40)), N)
        gain = undb(dip_db * (depth + DIP_UNEVEN * walk(20)))
        wet = wet + (gain - 1) * band
    return signal.sosfilt(signal.ellip(10, .2, 70, TOP_HZ, fs=SR, output="sos"), wet)


dry = scene()
out = record(dry)
unload_wav(out)
```